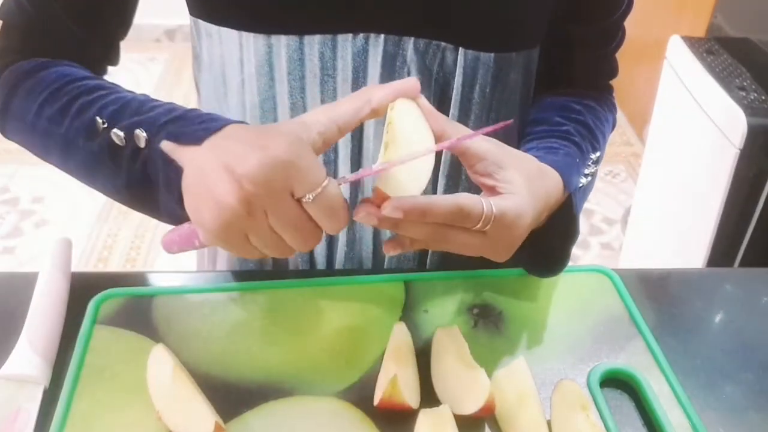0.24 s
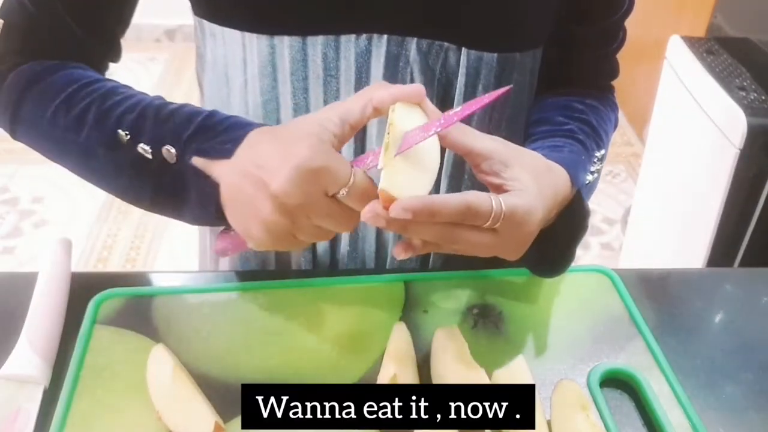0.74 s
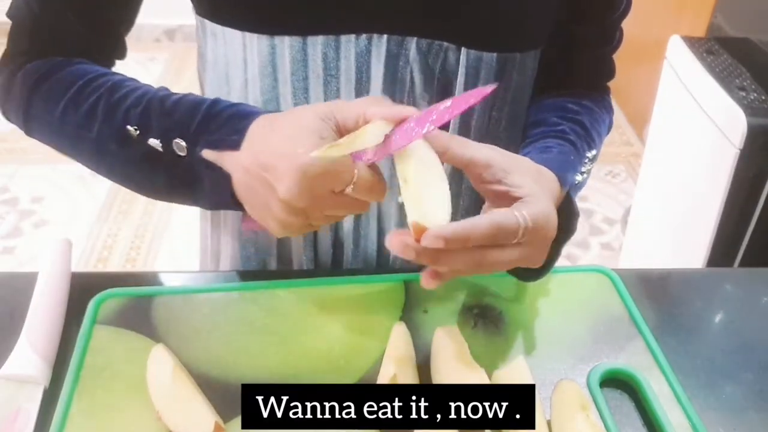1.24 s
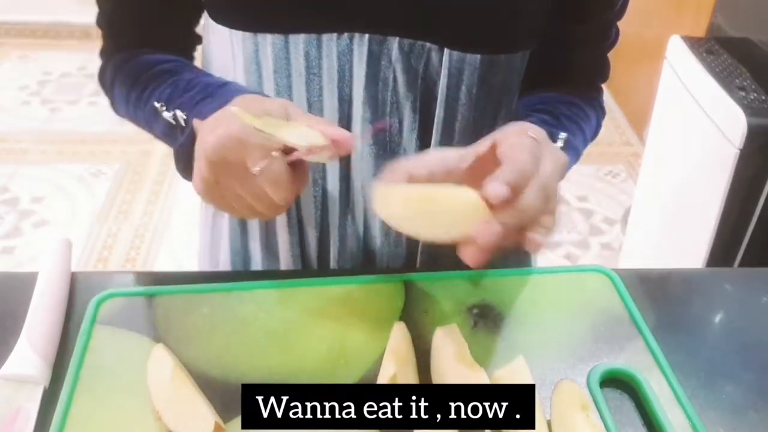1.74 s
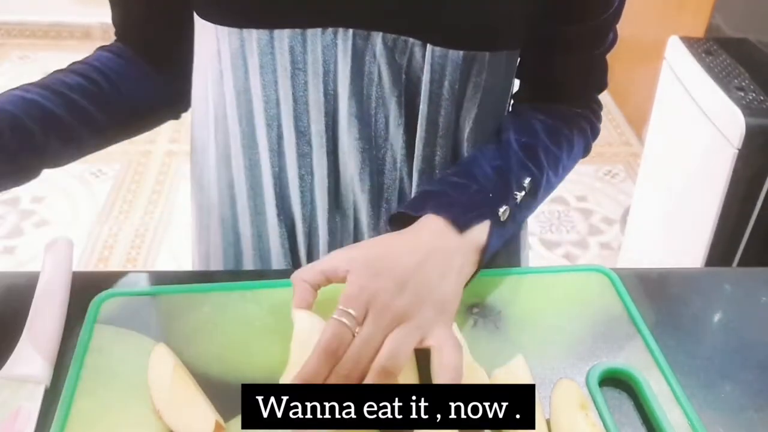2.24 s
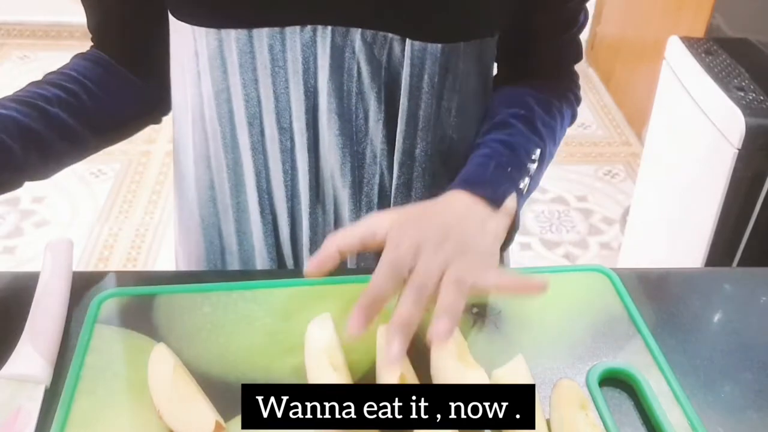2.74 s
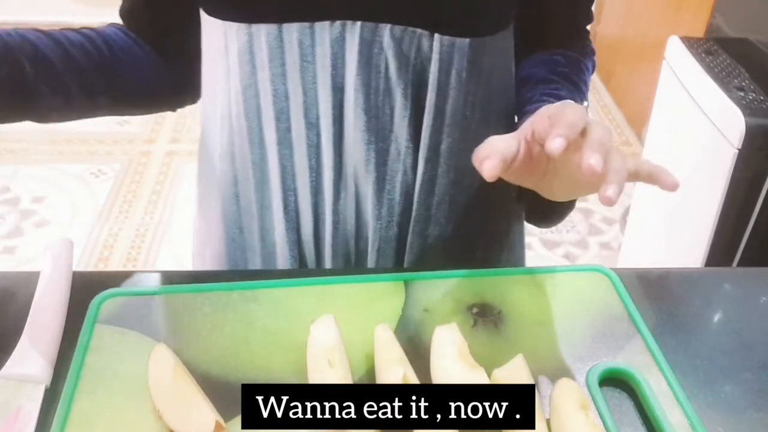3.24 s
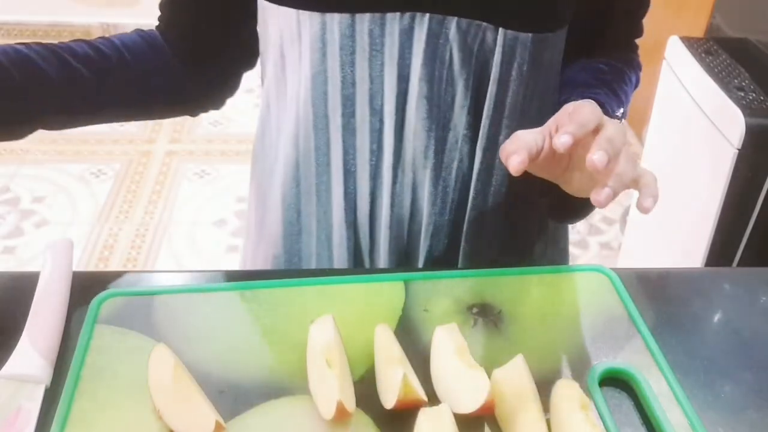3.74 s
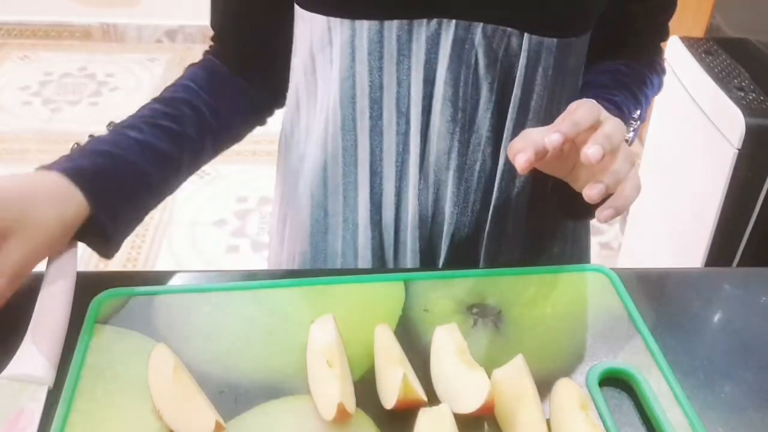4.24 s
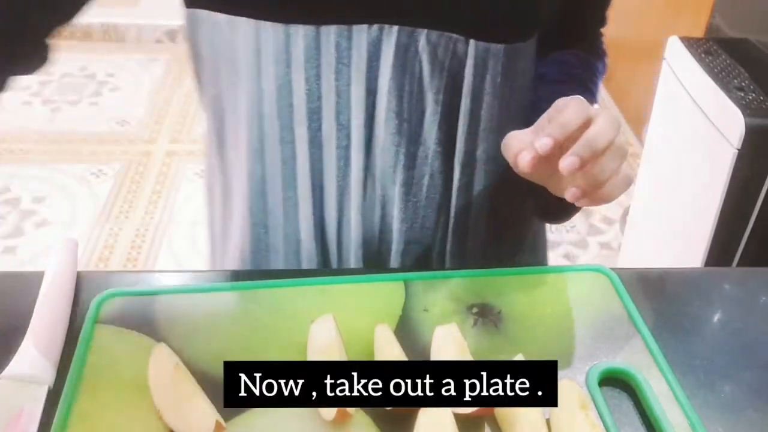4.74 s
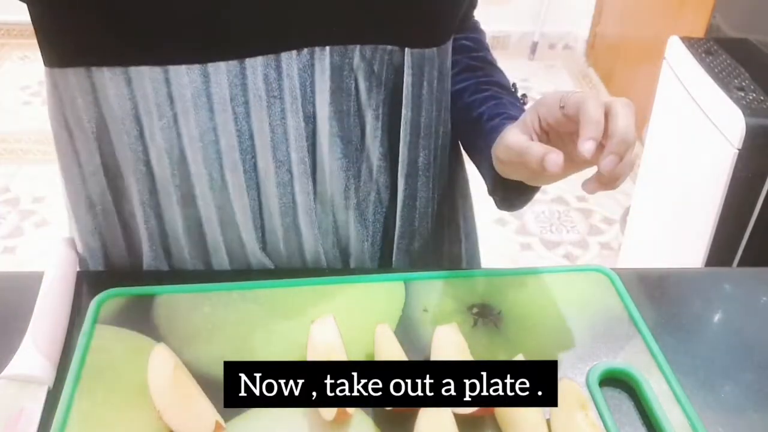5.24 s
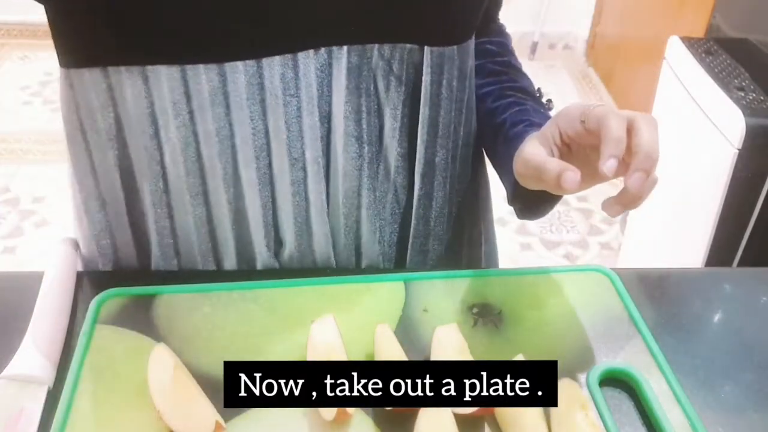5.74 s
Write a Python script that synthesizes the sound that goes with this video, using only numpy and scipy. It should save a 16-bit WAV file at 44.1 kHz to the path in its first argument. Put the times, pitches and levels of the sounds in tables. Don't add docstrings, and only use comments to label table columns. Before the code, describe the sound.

Close to a stereo phone microphone, a knife crunches into apple, with small snaps and a sharp tearing crack, then a slice breaks off and lands lightly on a plastic board. After a quiet gap the knife clatters among utensils with ringing metal and hollow counter thumps. A glass plate is then knocked against its stack. The hard kitchen echoes, and an engine idles outside.

```python
import sys
import numpy as np
from scipy import signal
from scipy.fft import rfft, irfft
from scipy.io import wavfile

SR = 44100
rng = np.random.default_rng(int(sys.argv[2]) if len(sys.argv) > 2 else 0)


def persist_wave(psi):
    counts = np.round(np.clip(psi, -1, 1) * 32767).astype(np.int16)
    wavfile.write(sys.argv[1], SR, np.atleast_2d(counts).T)


def voltage_ratio(level):
    return 10 ** (np.asarray(level, float) / 20)


N = 264600
T = np.arange(N) / SR

# [t/s, crunch level/dB]
BLADE = [(.1, -74), (.16, -67.5), (.46, -70), (.525, -54), (.6, -61), (.785, -61), (.82, -47.5), (.93, -56),
         (1.05, -53)]
# [f/Hz, density/dB]
CRUNCH = [(1500, -10.5), (2300, -12), (4300, -7.5), (5800, 2.5), (7300, 0.5), (8600, -7.5), (10300, -1),
          (12500, 1), (15000, 2), (16600, -31)]
# [t/s, level/dB, attack/s, t60/s]
RUB = [
    (0, -49.5, 0.00037, 0.0087),
    (.78, -60.5, 0.15, 0.52),
]
# [f/Hz, density/dB]
FLESH = [(400, -18.5), (620, -7.5), (850, -4), (1200, -8), (2000, -16.5)]
# [t/s, bright level/dB, body level/dB, t60/s]
SNAPS = [(0.2827, -57.5, -58, 0.1), (0.288, -63, -69, .06), (0.377, -50, -50, 0.13),
         (0.4793, -48, -44.5, 0.18), (0.5242, -47.5, -44.5, 0.078), (0.6974, -55, -55, 0.06),
         (.701, -59, -58, .04)]
# [f/Hz, density/dB]
SNAP_TOP = [(1470, -41), (2500, -7), (3740, -10), (4200, 2.5), (6000, 4), (8700, -8), (10300, -6),
            (12500, -4), (15500, -1), (16500, -33)]
# [f/Hz, density/dB]
SNAP_BODY = [(880, -47.5), (1500, -24), (1670, -12), (1860, -6), (2210, 3.5), (2630, -0.5), (4180, -2.5),
             (4500, -11.5), (5850, -32), (9900, -120)]
# [t/s, bright level/dB, body level/dB, t60/s]
TEAR = [(0.784, -47, -53, 0.059), (0.7915, -37.5, -53, 0.084), (0.7985, -43, -49, 0.046),
        (0.804, -32, -44.5, 0.038), (0.8102, -26.5, -39.5, 0.048), (0.817, -31, -43, 0.015),
        (0.825, -43, -44, 0.032)]
# [t/s, bright level/dB, body level/dB, t60/s]
FIBRES = [(.8072, -35, -45, 0.0041), (.8136, -30, -50, 0.0048), (.8162, -25, -52, .005),
          (.819, -28, -48, .006), (.8226, -30, -54, 0.0047), (.8294, -30, -47, 0.0044)]
# [f/Hz, density/dB]
TEAR_TOP = [(2000, -23), (3700, -24), (4250, -7.5), (4800, -10), (5900, -2), (7400, -7.5), (8700, -11),
            (11500, 0.5), (15500, -10.5), (16500, -36)]
# [t/s, bright level/dB, body level/dB, t60/s]
BREAK = [
    (1.5715, -35, -40.5, 0.03),
    (1.618, -47, -50.5, 0.03),
]
# [f/Hz, density/dB]
BREAK_TOP = [(1650, -24.5), (2200, -18), (3000, -1), (4500, -9.5), (7000, 5), (8800, -3.5), (12000, 4),
             (15500, -1.5), (16600, -33)]
# [t/s, bright level/dB, body level/dB, t60/s]
PIECES = [
    (2.5912, -39, -61, 0.027),
    (2.603, -51.5, -67, 0.032),
    (2.615, -59.5, -70.5, 0.14),
]
# [f/Hz, density/dB]
PIECE_TOP = [(1650, -27.5), (3500, -19.5), (4900, -2.5), (5600, -5.5), (6300, 1.5), (8400, -7.5),
             (11000, -13.5), (15200, -1), (16600, -32)]

# [t/s, rattle level/dB, sizzle level/dB, ring level/dB, thud level/dB]
CLATTER = [(4.1116, -34.5, -38.5, -47.5, -44), (4.1148, -16.5, -27, -28.5, -32.5),
           (4.1178, -22.5, -33, -15.5, -43.5), (4.125, -15, -26.5, -28.5, -43.5),
           (4.13, -10.5, -18.5, -15.5, -36), (4.1345, -22.5, -26.5, -25.5, -45.5),
           (4.1395, -24.5, -30, -33, -48), (4.149, -25.5, -29.5, -36, -51.5), (4.1755, -37, -32, -32, -48),
           (4.2121, -20.5, -36.5, -22, -56), (4.3385, -33.5, -61, -50, -26), (4.36, -35, -52, -33, -33),
           (4.3852, -24.5, -34, -52, -49.5), (4.3875, -21, -25, -54, -42), (4.3925, -21.5, -37, -50, -50.5),
           (4.4595, -23.5, -33.5, -46, -36.5), (4.4665, -38, -38, -25.5, -36.5),
           (4.4697, -24.5, -40.5, -18.5, -50.5), (4.4904, -22.5, -21.5, -54.5, -38.5),
           (4.515, -25.5, -42, -31, -43.5), (4.5195, -27.5, -34, -45, -53), (4.526, -34, -42, -51, -49)]
# [f/Hz, density/dB]
RATTLE = [(1470, -20), (2500, -18.5), (2950, -4), (3840, -5), (4500, -2.5), (6190, 1.5), (7400, 0.5),
          (8300, -24.5), (11000, -32), (18700, -120)]
# [f/Hz, density/dB]
FIRST_SIZZLE = [(4710, -19.5), (7300, 1.5), (8700, -2), (11000, 0), (12500, 1), (14000, -5.5), (15700, -6),
                (16500, -25.5)]
# [f/Hz, density/dB]
SETTLING_SIZZLE = [(4710, -26), (7300, 1.5), (9200, 0), (10200, 0.5), (11200, -2), (12500, -1), (15500, 0),
                   (16500, -17)]
# [f/Hz, level/dB, t60/s, pan/dB]
FIRST_METAL = [(2060, -16.5, 0.18, 1), (2122, -5.5, 0.17, -12), (2174, -7, 0.11, -5.5),
               (2370, -10.5, .05, 0), (2450, -16, 0.08, 7), (2464, -21, 0.12, 3), (2890, -15, 0.06, -4.5),
               (3140, -15.5, .06, 1.5), (7690, -23, 0.05, 8.5)]
# [f/Hz, level/dB, t60/s, pan/dB]
SETTLING_METAL = [(2142, -4.5, 0.021, -12.5), (2242, -2, 0.037, -6), (2500, -6.5, 0.074, -2),
                  (2790, -18, 0.048, 13.5), (3370, -20, 0.061, -3), (5450, -12, 0.03, 2),
                  (5770, -11.5, .04, -5), (6180, -10, 0.036, -3.5), (7440, -16, 0.036, 4)]
# [f/Hz, level/dB, t60/s, pan/dB]
COUNTER_EDGE = [(460, -9.5, 0.11, -5.5), (601.4, -5.5, 0.17, 3), (700, -11, 0.059, -2),
                (830, -9, 0.12, -1.5), (1120, -12, .07, 2.5), (1550, -6.5, 0.044, 2)]
# [f/Hz, level/dB, t60/s, pan/dB]
COUNTER = [(441, -12.5, 0.078, -4), (612, -11, 0.15, 3), (723, -15.5, 0.059, 11), (880, -4.5, 0.1, -3.5),
           (897, -13, 0.069, 7), (1043, -8, 0.1, 3.5), (1273, -5.5, 0.089, -2), (1485, -21, .05, 0),
           (1804, -2.5, 0.043, 1), (2030, -9.5, 0.036, -1.5)]
# [f/Hz, density/dB]
THUMP = [(300, -40.0), (500, -9.5), (900, 4.0), (1500, -2.0), (2500, 2.0), (4000, -27.0)]

# [t/s, knock level/dB, stack level/dB, glass level/dB, upper glass level/dB]
PLATE_HITS = [(5.5078, -20, -37, -65, -49), (5.5126, -37, -36, -52.5, -52.5),
              (5.5354, -30, -34.5, -50, -56), (5.548, -39, -50, -51, -66), (5.5623, -27, -32, -58, -55.5),
              (5.572, -35, -61, -46, -64), (5.59, -42, -47, -58, -55.5), (5.6311, 5.5, -34, -9, -24),
              (5.6369, -21, -21.5, -14.5, -38.5), (5.661, -28, -40.5, -21, -62),
              (5.7218, -30, -38, -26.5, -55), (5.9964, -41.5, -38.5, -43, -55)]
# [f/Hz, density/dB]
KNOCK = [(300, -35.5), (550, -20), (870, -6), (1400, 8), (2260, 0), (2900, -9.5), (3700, -11.5),
         (4800, -14.5), (7000, -39.5), (9000, -53), (16000, -63)]
# [t/s, level/dB, attack/s, t60/s]
RUBBING = [
    (5.2, -57.5, 0.065, 0.43),
    (5.432, -61.5, 0.008, 0.51),
    (5.506, -33, 0.00343, 0.46),
    (5.55, -48.5, 0.032, 0.097),
]
# [f/Hz, density/dB]
SLIDE = [(500, -15.5), (800, 2), (1150, 5.0), (1600, 8.0), (2500, -10.0), (3300, -45.5)]
# [f/Hz, density/dB]
GLASS_CRACK = [(3000, -18.5), (5000, 6.5), (12000, -6.5), (16000, -5.0)]
# [f/Hz, level/dB, t60/s, pan/dB]
STACK = [(616, -11.5, 0.072, -5), (886.4, -6, 0.18, -6), (1177, -19, 0.071, 4.5), (1300, -8.5, 0.095, 0.5),
         (1235, -6.5, 0.023, -11.5), (1372, -2.5, 0.2, -2.5), (1390, -1, 0.052, 8.5), (1596, -3, 0.13, 8),
         (1800, -6.5, 0.081, -5), (1950, -2.5, 0.027, -12.5), (1994, -12.5, 0.054, 4.5),
         (2080, -16, 0.068, -4.5), (2390, -8.5, 0.07, -3), (2557, -10, 0.048, 4.5)]
# [f/Hz, level/dB, t60/s, pan/dB]
GLASS = [(2950, -19.5, 0.066, -2), (3128, -10, 0.1, -2), (3180, -1, 0.13, -8), (3240, -11, 0.23, 3.5),
         (3297, -4.5, 0.1, 1), (3290, -11.5, .07, 5.5), (3350, -22.5, 0.09, 8.5)]
# [f/Hz, level/dB, t60/s, pan/dB]
GLASS_TOP = [(5470, -1.5, 0.098, -4.5), (5560, -0.5, 0.07, 5.5), (7800, -3.5, 0.07, 15),
             (8050, 0.5, 0.08, 12.5), (8140, -3, 0.06, 8), (9960, -13, .05, 5.5), (10060, -4, 0.083, 10),
             (11590, -11.5, 0.08, 9.5), (11950, -5.5, .06, 9), (11970, -3.5, 0.1, 9.5),
             (13290, -18, 0.06, 11.5), (13560, -11.5, 0.05, 9.5), (14850, -13.5, 0.048, 8),
             (14990, -5.5, 0.08, 10.5)]
# [f/Hz, level/dB, t60/s, pan/dB]
GRAZED_TOP = [(3330, -9, .06, 0), (5465, -3, 0.065, 9), (5600, -3, 0.084, 14), (7950, -2.5, 0.069, 16),
              (8150, -7, 0.11, 6), (10060, -12, 0.16, 9), (11600, -9, 0.12, 13), (12050, -13, 0.13, 13),
              (13300, -12, .05, 4), (14700, -13, .1, 10)]

# [t/s, peak level/dB, f/Hz, t60/s]
TICKS = [(1.479, -49, 6900, 0.005), (2.16, -59, 4100, 0.018), (2.181, -58, 4120, 0.024),
         (2.33, -59, 4120, 0.044), (3.019, -52, 3170, 0.015), (3.041, -56, 6300, .006),
         (2.6, -68, 4600, .25), (2.62, -62, 5050, 0.22), (3.116, -50.5, 6600, 0.015),
         (3.1162, -53, 3000, .01), (3.1161, -48, 4500, .005), (3.468, -57, 5450, .005)]
# [t/s, level/dB, attack/s, t60/s]
RUSTLE = [
    (2.12, -71, 0.068, 1),
    (2.75, -74.5, 0.2, 0.6),
]
# [f/Hz, density/dB]
RUSTLE_BAND = [(1500, -22.5), (3000, -15.0), (4400, 0.0), (6000, -18.0)]
# [t/s, level/dB, attack/s, t60/s]
BRUSH = [
    (2.68, -82.5, 0.17, 0.45),
]
# [f/Hz, density/dB]
BRUSH_BAND = [(7500, -19.5), (9300, 3), (11500, -3), (13000, -22.5)]

# [f/Hz, t60/s, left-right likeness/1]
REVERB = [(533, 0.46, 0.63), (800, 0.7, 0.19), (1870, 0.71, 0.087), (3760, 0.7, 0.25), (7100, 0.46, 0.031),
          (15000, 0.37, 0.23)]

# [t/s, level/dB]
IDLE_LEVEL = [(0.0, -20.5), (0.04, -30.5), (0.9, -33.5), (2.0, -33), (2.12, -22.5), (2.2, -27), (2.38, -23),
              (2.49, -33), (2.67, -21.5), (2.9, -53.5), (3.25, -42), (3.44, -23), (3.53, -29), (3.72, -29),
              (4.55, -31), (5.25, -38.5), (5.45, -32.5), (6.0, -33)]
# [t/s, f/Hz]
IDLE_SPEED = [(0, 13.7), (.76, 13.6), (.9, 10.85), (1.8, 10.9), (1.95, 14.2), (2.3, 14.15), (3.5, 14.0),
              (4.4, 14.05), (4.75, 13.8), (5.05, 13.4), (5.55, 13.55), (6, 13.2)]
# [multiple/1, level/dB]
PASSER_ORDERS = [(1, -47.5), (2, -18), (3, -24.5), (4, -27), (5, -1), (6, -4), (7, -12), (8, -25.5),
                 (9, -15), (10, -21), (11, -30), (12, -30), (13, -32), (14, -17.5), (15, -22.5), (16, -29)]
# [f/Hz, density/dB]
WINDOW = [(15, -49.5), (25, -25), (54, -9.5), (70, -3), (96, 3.5), (112, -3.5), (168, -5.5), (186, -13),
          (210, -15.5), (244, -24), (330, -19.5), (472, -35.5), (900, -55), (1170, -93.5), (1980, -120)]
# [f/Hz, width/Hz, level/dB]
ROOM_MODES = [(85.65, 3, 7.5), (111.32, 7.5, 12), (129, 4.4, -11.5), (161.5, 5.7, 9.5), (212, 14, 3.5),
              (265.3, 25, 5), (310.5, 12, 5), (340.3, 9.6, 1.5), (379, 6.2, -5.5)]
# [f/Hz, level/dB]
ROAD_TILT = [(45, -15.5), (100, -1.5), (250, -1.0)]
# [f/Hz, density/dB]
AIR = [(240, -36), (400, -3.5), (426, -15), (563, -33.5), (609, -18), (781, -24), (1000, -18), (1780, -26),
       (3030, -19), (3650, -30.5), (4530, -33.5), (6590, -22), (7940, -43), (15300, -36), (16500, -61.5)]
# [f/Hz, density/dB]
ROAR = [(300, -38.0), (500, 11.5), (900, 5.5), (1800, -19.0), (3000, -16.0), (4800, -8.0), (6500, -48.5)]
# [t/s, level/dB, attack/s, t60/s]
SWISH = [
    (2.6, -70.5, 0.36, 0.76),
]
# [f/Hz, density/dB]
SWISH_BAND = [(1000, -24.5), (1700, -1), (2400, -6), (3100, -5.0), (3800, -31.5)]

PASS_S = 2.831
ENGINE_NEAR_S, ROAD_NEAR_S, TYRE_NEAR_S = 0.35, 0.35, 0.15
CRACK_T60_S = 0.0074


def knife():
    leaving = np.maximum(T - BLADE[-1][0], 0) / 0.3
    crunch_db = columns(BLADE)[0] - 60 * leaving ** 2
    grains = unit(rng.standard_normal(N) * voltage_ratio(drift(40.0, count=1)[0]))
    crunch = colour(grains * voltage_ratio(crunch_db - 3.5) * (T > BLADE[0][0]), CRUNCH)
    rub = colour(rng.standard_normal(N) * swell(RUB), FLESH)
    cut = place(crunch + rub, pan_db=11.5, lag=-1)
    cut += snaps(SNAPS, SNAP_TOP, dull_db=-29.0, pan_db=1.0)
    cut += snaps(TEAR, TEAR_TOP, dull_db=-28.0, pan_db=1.0, rise=0.0042)
    cut += snaps(FIBRES, TEAR_TOP, dull_db=-20.0, pan_db=10.0, rise=0.00018)
    return cut


def apple_pieces():
    broken = snaps(BREAK, BREAK_TOP, dull_db=-3.0, pan_db=8.0)
    return broken + snaps(PIECES, PIECE_TOP, dull_db=-2.0, pan_db=7.5)


def snaps(rows, top, dull_db, pan_db, rise=0.00079):
    s, bright_db, body_db, t60 = np.transpose(rows)
    crack = colour(bursts(s, bright_db - 0.5, t60, rise=rise), top)
    body = colour(bursts(s, body_db - 6.0, t60), SNAP_BODY)
    thud = colour(bursts(s, (bright_db + body_db) / 2 + dull_db, t60 * 1.2), FLESH)
    return place(crack + body + thud, pan_db, lag=-1)


def utensils():
    s, rattle_db, sizzle_db, ring_db, thud_db = np.transpose(CLATTER)
    t60 = np.full(len(s), 0.031)
    rattle = colour(bursts(s, rattle_db - 6.0, t60, rise=0.00041), RATTLE)
    grit = bursts(s, sizzle_db, t60 * 0.79, rise=0.00009)
    grit += bursts(s, sizzle_db - 8.5, 0 * s + CRACK_T60_S, rise=0.00084)
    settle_s = 4.3
    settling = np.arange(N) > settle_s * SR
    sizzle = colour(grit * ~settling, FIRST_SIZZLE) + colour(grit * settling, SETTLING_SIZZLE)
    thump = colour(bursts(s, thud_db - 10.5, t60 * 5.6), THUMP)

    first = s < settle_s
    metal = ring(s[first], ring_db[first] - 1.0, FIRST_METAL, lag=-3.5, spread_db=5.0)
    metal += ring(s[~first], ring_db[~first] + 0.5, SETTLING_METAL, lag=-8.0, spread_db=1.0)
    counter = ring(s[first], thud_db[first] + 0.5, COUNTER_EDGE, lag=-10.5, spread_db=-2.5)
    counter += ring(s[~first], thud_db[~first] - 0.5, COUNTER, lag=-11.0, spread_db=3.0)

    noise = place(rattle, pan_db=6.5, lag=-5.5) + place(sizzle, pan_db=11.5, lag=-2.5)
    noise += place(thump, pan_db=1.5, lag=0.6)
    return noise, metal + counter


def plate():
    s, knock_db, stack_db, glass_db, top_db = np.transpose(PLATE_HITS)
    knock = colour(bursts(s, knock_db - 7.5, np.full(len(s), 0.015), rise=0.00057), KNOCK)
    slide = colour(rng.standard_normal(N), SLIDE) * swell(RUBBING)

    grazed = s < 5.6
    crack_db = top_db - 11.0 - 14.0 * grazed
    crack = colour(bursts(s, crack_db, 0 * s + CRACK_T60_S, rise=0.00016), GLASS_CRACK)
    stack = ring(s, stack_db, STACK, lag=10.2, spread_db=-4.5)
    glass = ring(s, glass_db - 0.5, GLASS, lag=23.7, spread_db=1.5)
    glass += ring(s[~grazed], top_db[~grazed] - 3.5, GLASS_TOP, lag=14.0, spread_db=3.5)
    glass += ring(s[grazed], top_db[grazed] - 3.0, GRAZED_TOP, lag=14.0, spread_db=6.0)
    return place(knock + slide, pan_db=8.5, lag=13.9) + stack, glass + place(crack, pan_db=9.5, lag=19.0)


def fingers():
    out = colour(pair(side_db=4.0), RUSTLE_BAND) * swell(RUSTLE)
    out += colour(pair(side_db=1.5), BRUSH_BAND) * swell(BRUSH)
    for s, db, hz, t60 in TICKS:
        out += ring([s], db - 1, [(hz, 0, t60, 0)], lag=-0.5, spread_db=0)
    return out


def kitchen(x, build_up=0.0061):
    t = np.arange(SR) / SR
    tail = 0
    for hz, t60, alike in REVERB:
        edges = [hz / np.sqrt(2), min(hz * np.sqrt(2), .45 * SR)]
        band = signal.butter(2, edges, "band", fs=SR, output="sos")
        mid, side = signal.sosfilt(band, rng.standard_normal((2, SR))) * voltage_ratio(-60 * t / t60)
        alike = np.clip(alike, -1, 1)
        tail = tail + np.sqrt(1 + alike) * mid + np.sqrt(1 - alike) * side * [[1], [-1]]
    tail = tail * np.clip(t / build_up, 0, 1)
    tail = tail / np.sqrt(np.sum(tail ** 2) / 2)
    return signal.fftconvolve(np.mean(x, axis=0)[None], tail, axes=1)[:, :N]


def traffic():
    drone = idling_engines() + passing_engine()
    wall_echo = voltage_ratio(-17.0) * np.roll(drone, SR // 300) * [[1], [-1]]
    return place(drone, pan_db=1.9, lag=-1.2) + wall_echo + road()


def idling_engines():
    level_db, = columns(IDLE_LEVEL)
    cycle_hz, = columns(IDLE_SPEED)
    order = np.arange(1, 27)[:, None]
    start, end, ease = 2.09, 3.8, 0.18
    pull = np.interp(T, [start - ease, start, end, end + ease], [0, 1, 1, 0])
    low_db = 1.5 - 7 * pull
    is_low = np.clip((96 - order * cycle_hz) / 10, 0, 1)
    order_db = 3.2 * (order % 2 == 0) + 2 * low_db * is_low
    idler = engine(cycle_hz, order_db, wobble_db=3.5 + 0.038 * order, smear=0.9)
    return unit(colour(idler, WINDOW, ROOM_MODES)) * voltage_ratio(level_db - 0.5)


def passing_engine():
    doppler = 1 - 0.012 * np.tanh((T - PASS_S) / ENGINE_NEAR_S)
    passer = engine(23.14 * doppler, np.array(PASSER_ORDERS)[:, 1:], wobble_db=-0.5, smear=1.0)
    return unit(passer) * voltage_ratio(-25.0) * nearness(ENGINE_NEAR_S)


def engine(firing_hz, order_db, wobble_db, smear):
    count = len(order_db)
    phase = 2 * np.pi * np.cumsum(firing_hz) / SR
    start = smear * rng.standard_normal((count, 1))
    level = voltage_ratio(order_db + wobble_db * drift(2.478, count=count))
    return np.sum(level * np.cos(np.arange(1, count + 1)[:, None] * phase + start), axis=0)


def road():
    gain = voltage_ratio(-48 + 0.26 * T) + voltage_ratio(-37) * nearness(ROAD_NEAR_S)
    rumble = colour(pair(side_db=-5.5), WINDOW, ROOM_MODES) * gain * voltage_ratio(8.5)
    return colour(rumble, ROAD_TILT)


def air():
    roar = colour(pair(side_db=1.5), ROAR) * (voltage_ratio(-84.0) + voltage_ratio(-62.0) * nearness(TYRE_NEAR_S))
    hiss = colour(pair(side_db=-6.0), AIR) * (voltage_ratio(-67.5) + voltage_ratio(-79.0) * nearness(ROAD_NEAR_S))
    swish = colour(pair(side_db=1.0), SWISH_BAND) * swell(SWISH)
    return hiss + swish + roar


def nearness(near_s):
    return 1 / (1 + ((T - PASS_S) / near_s) ** 2)


def bursts(times, dbs, decays, rise=0.0016):
    env = np.zeros(N)
    for s, db, t60 in zip(times, dbs, decays):
        i = int(s * SR)
        age = T[i:i + SR // 4] - s
        env[i:i + SR // 4] += voltage_ratio(db - 60 * age / max(t60, .003)) * np.clip(age / rise, 0, 1)
    return env * rng.standard_normal(N)


def ring(times, dbs, modes, lag, spread_db):
    at = (np.asarray(times) * SR).astype(int)
    first = at.min()
    luck = rng.standard_normal((len(at), len(modes)))
    out = np.zeros((2, N))
    for k, (hz, db, t60, pan_db) in enumerate(modes):
        clicks = np.full(N - first, 1e-18)
        clicks[at - first] = (-1) ** k * voltage_ratio(dbs + db + spread_db * luck[:, k])
        r = voltage_ratio(-60 / (np.clip(t60, .002, .45) * SR))
        w = 2 * np.pi * hz / SR
        tone = signal.lfilter([0, np.sin(w)], [1, -2 * r * np.cos(w), r * r], clicks)
        out[:, first:] += tone * voltage_ratio([[pan_db / 2], [-pan_db / 2]])
    return delay(out[0], out[1], lag)


def place(x, pan_db, lag):
    return delay(voltage_ratio(pan_db / 2) * x, voltage_ratio(-pan_db / 2) * x, lag)


def delay(left, right, lag):
    return np.array([np.roll(left, max(round(lag), 0)), np.roll(right, max(round(-lag), 0))])


def pair(side_db):
    mid, side = rng.standard_normal((2, N))
    return mid + voltage_ratio(side_db) * side * [[1], [-1]]


def swell(rows):
    env = np.zeros(N)
    for s, db, rise, t60 in rows:
        fall_db = 60 * np.maximum(T - s - rise, 0) / t60
        env += np.clip((T - s) / rise, 0, 1) * voltage_ratio(db - fall_db)
    return env


def drift(rate, count):
    knots = rng.standard_normal((count, 400))
    return np.array([np.interp(T * rate, np.arange(400), k) for k in knots])


def columns(rows):
    s, *cols = np.transpose(rows)
    return [np.interp(T, s, c) for c in cols]


def unit(x):
    return x / np.sqrt(np.mean(x ** 2) + 1e-20)


def colour(x, points, modes=()):
    size = 2 ** 15
    hz = np.fft.rfftfreq(size, 1 / SR)
    point_hz, point_db = np.transpose(points)
    db = np.interp(np.log(hz + 1), np.log(point_hz), point_db)
    for mode_hz, width, mode_db in modes:
        db = db + mode_db / (1 + (2 * (hz - mode_hz) / width) ** 2)
    cepstrum = irfft(np.log(voltage_ratio(db)))
    cepstrum[1:size // 2] *= 2
    taps = irfft(np.exp(rfft(cepstrum[:size // 2], size)))[:size // 2]
    taps = (taps / np.linalg.norm(taps)).reshape((1,) * (x.ndim - 1) + (-1,))
    live = np.flatnonzero(np.atleast_2d(x)[0])
    part = signal.fftconvolve(x[..., live[0]:live[-1] + 1], taps, axes=-1)
    out = np.zeros(x.shape[:-1] + (N + size,))
    out[..., live[0]:live[0] + part.shape[-1]] = part
    return out[..., :N]


def scene():
    street = traffic() + air()
    cut, (rattle, clang), (knock, chime) = knife(), utensils(), plate()
    pieces = apple_pieces()
    direct = cut + pieces + rattle + clang + knock + chime + fingers()
    wet = voltage_ratio(-4.0) * cut + voltage_ratio(-0.2) * pieces + voltage_ratio(-3.0) * rattle
    wet += voltage_ratio(-3.5) * clang + voltage_ratio(-5.0) * knock + voltage_ratio(-6.5) * chime
    return direct + kitchen(wet) + street


def low_pass(x):
    return signal.sosfilt(signal.butter(12, 16800, fs=SR, output="sos"), x)


def record(dry):
    thin = signal.sosfilt(signal.butter(4, 38.0, "high", fs=SR, output="sos"), dry)
    thin = signal.sosfilt(signal.ellip(8, .5, 30, 15750, fs=SR, output="sos"), thin)
    rounded = .9 * np.tanh(thin / .9)
    return low_pass(rounded)


dry = scene()
out = record(dry)
persist_wave(out)
```